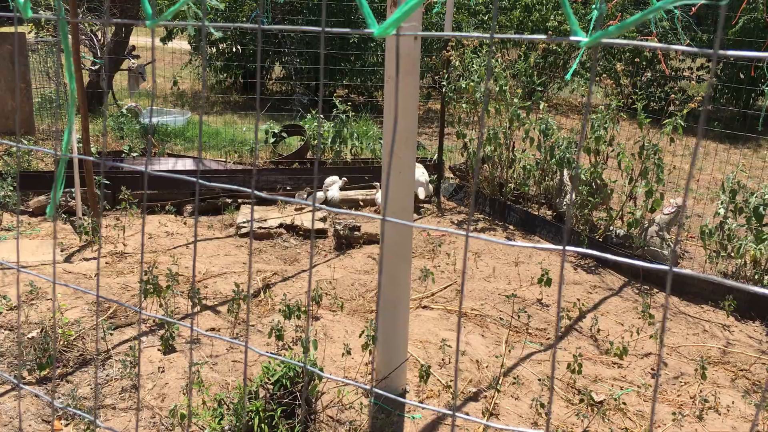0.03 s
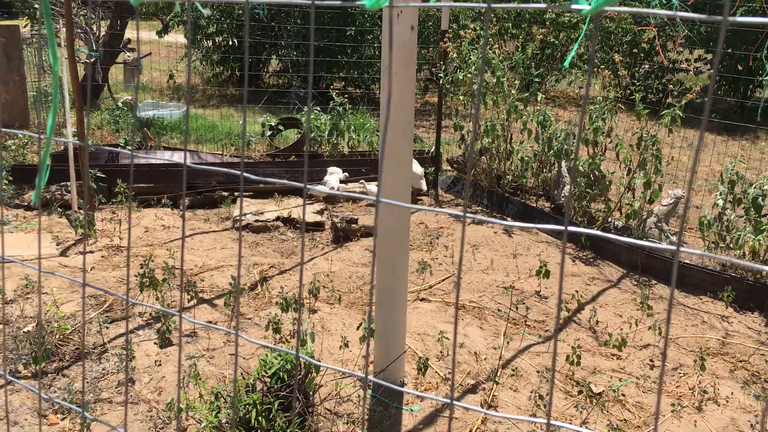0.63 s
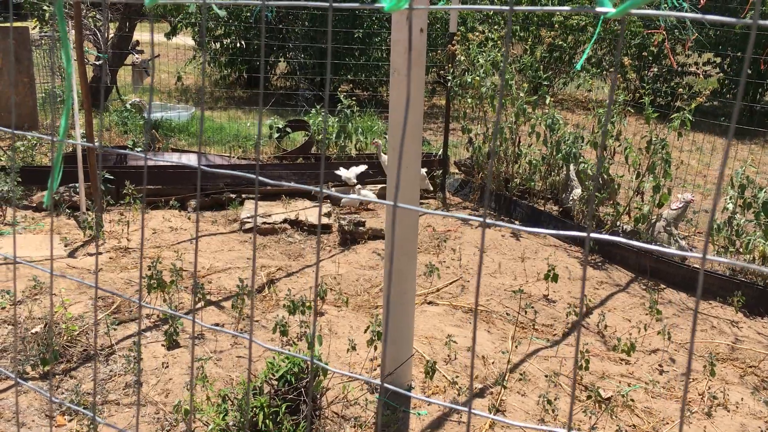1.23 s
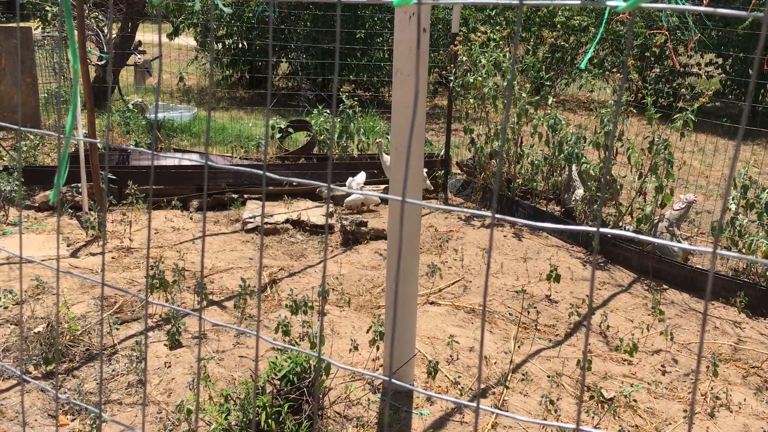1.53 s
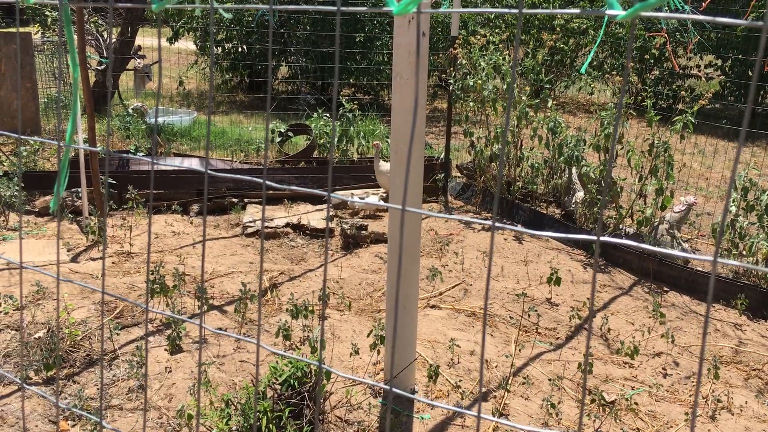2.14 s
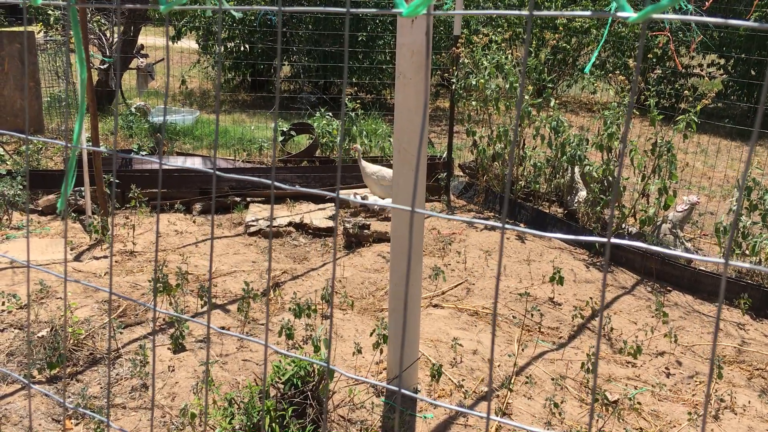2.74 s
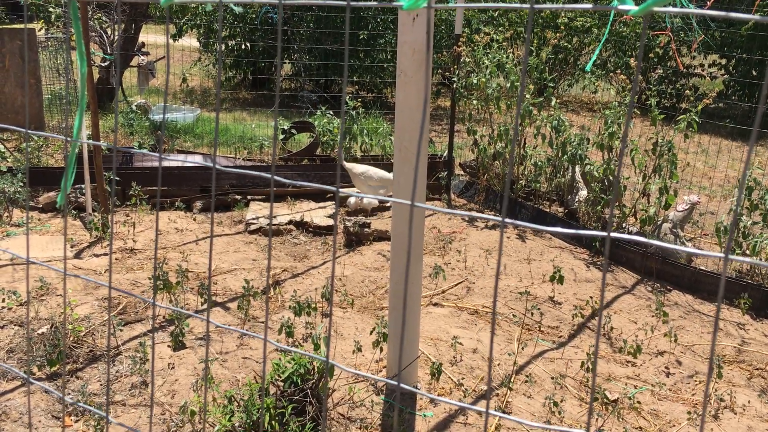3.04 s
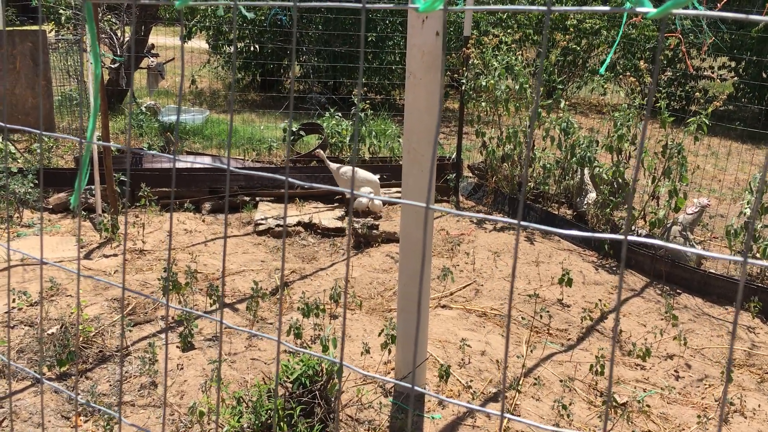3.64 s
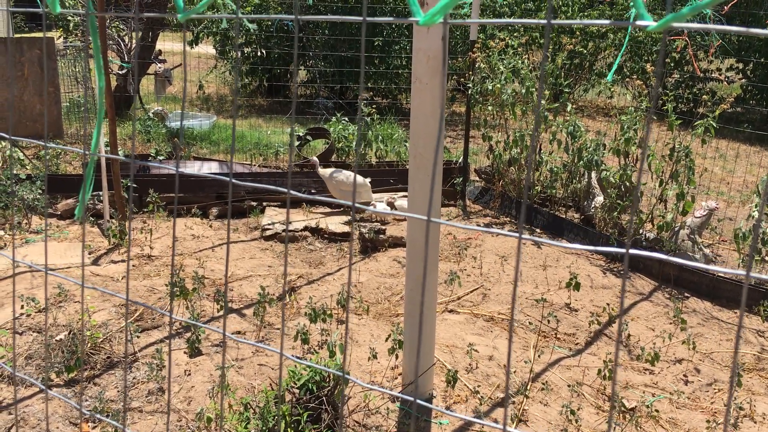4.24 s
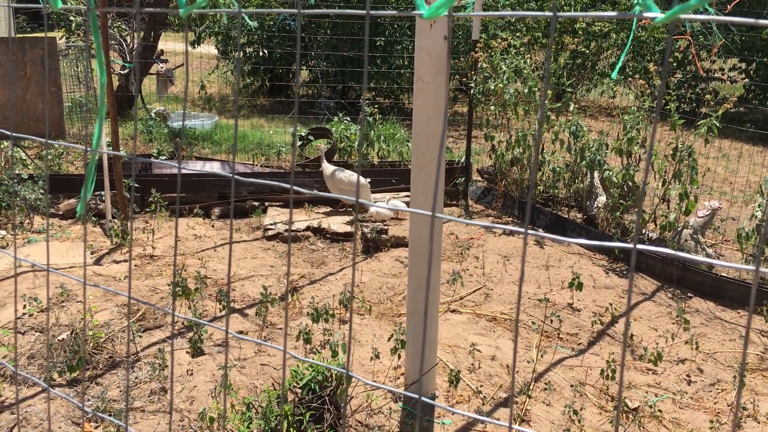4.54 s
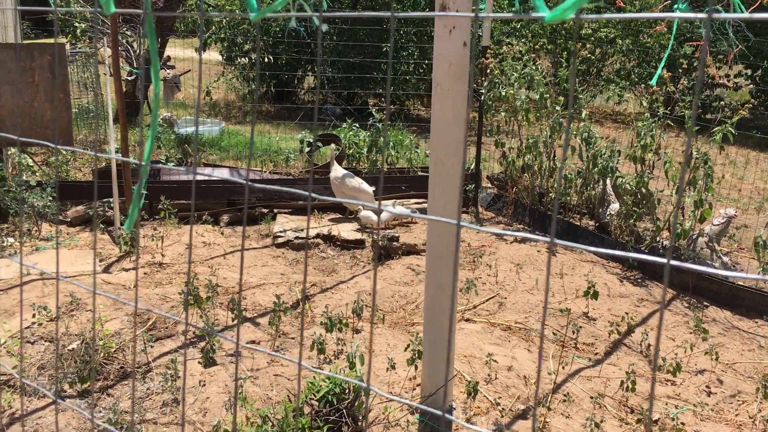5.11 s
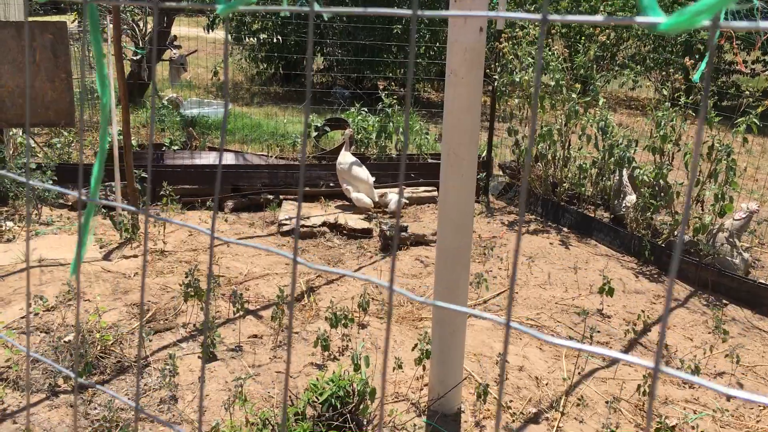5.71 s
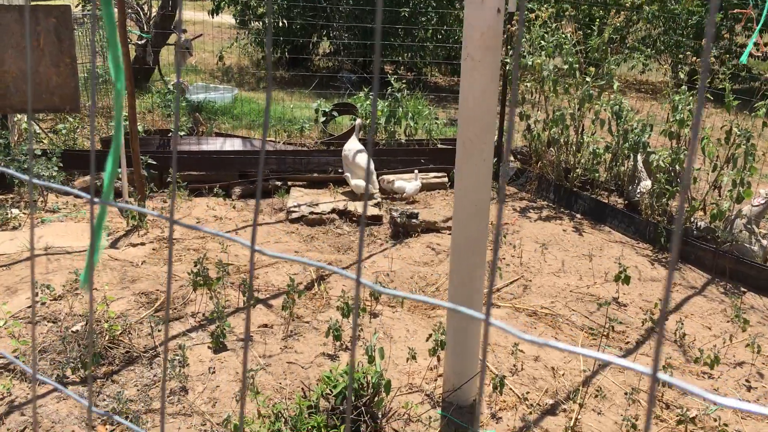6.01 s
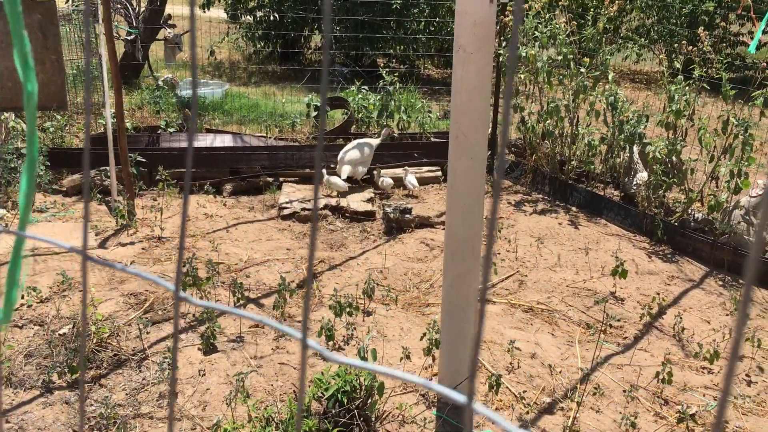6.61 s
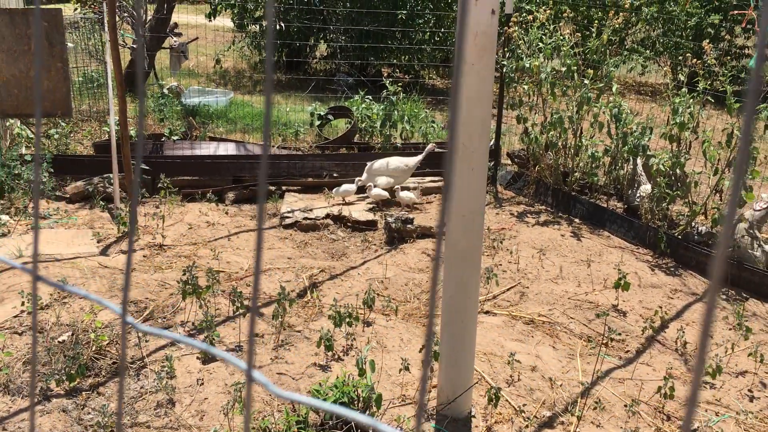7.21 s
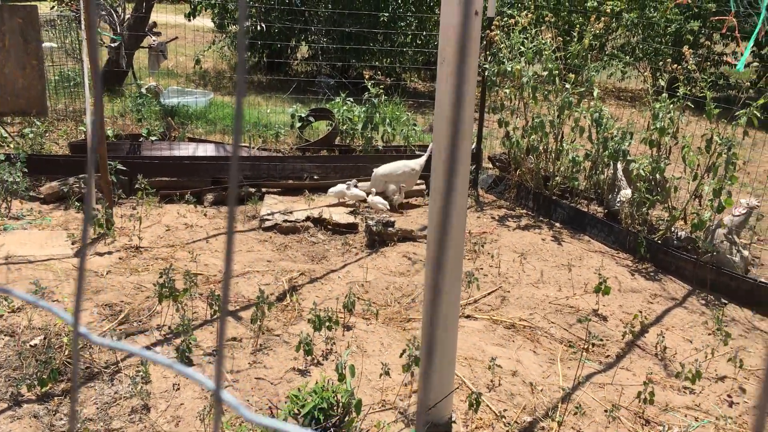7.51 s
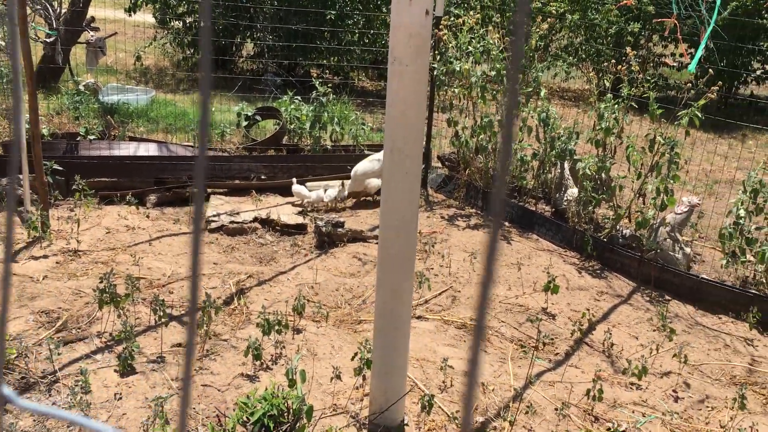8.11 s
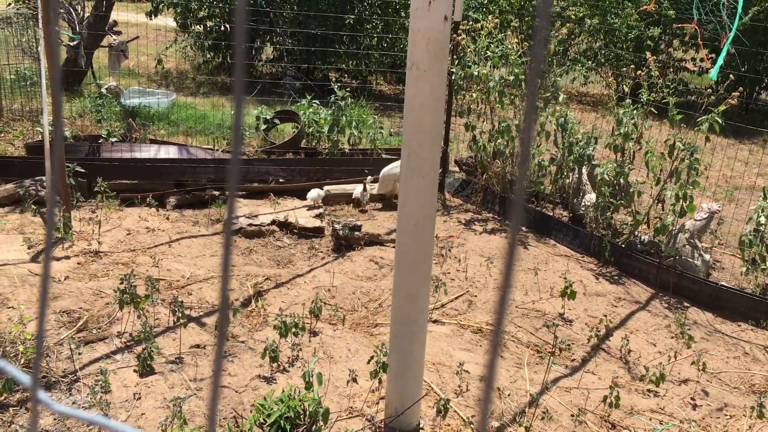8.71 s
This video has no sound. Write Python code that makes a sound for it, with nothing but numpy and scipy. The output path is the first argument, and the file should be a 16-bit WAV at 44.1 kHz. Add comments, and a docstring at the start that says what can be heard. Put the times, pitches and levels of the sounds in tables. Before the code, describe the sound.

At an outdoor fowl pen, three close cicadas rasp and pulse in turn through the first half, with brief guinea hen clucks in between. Far cicadas, a low distant engine and a soft breeze carry on underneath. Then come light scuffs, small knocks on the microphone, a thin songbird whistle and a few chick peeps, before a short whine from the hen and one more cicada swell.

```python
"""A hot day at a fowl pen: far cicadas hiss, a distant engine drones and a light breeze blows throughout.
From the start, three near cicadas swell in turn from a smooth hiss into a throbbing rasp, each clicking
its tymbals (ribbed, drum-like plates), while a guinea hen clucks now and then and her chicks peep.
From about 5 s come short scuffs, small handling knocks at the one microphone, and a songbird's whistle.
Near the end the hen whines and a fourth cicada swells."""
import sys
import numpy as np
from scipy import signal
from scipy.fft import rfft, irfft, next_fast_len
from scipy.io import wavfile
from scipy.ndimage import uniform_filter1d, map_coordinates

SR = 44100
rng = np.random.default_rng(int(sys.argv[2]) if len(sys.argv) > 2 else 0)


def file_out(sig):
    """Save sig as 16-bit WAV at sys.argv[1]."""
    # one column per channel
    cols = np.atleast_2d(sig).T
    # limit, then scale
    lim = np.clip(cols, -1, 1)
    pcm = np.round(lim * 32767).astype(np.int16)
    wavfile.write(sys.argv[1], SR, pcm)


N = 385875
T = np.arange(N) / SR


def amp(db):
    """Turn decibels into a gain."""
    return 10 ** (np.asarray(db) / 20)


def unit(x):
    """Scale a sound to an average strength (rms) of 1."""
    return x / np.sqrt(np.mean(x ** 2) + 1e-20)


def add(out, start, sound):
    """Mix a sound in at a start time in seconds."""
    out[round(start * SR):][:len(sound)] += sound


def wobble(rate):
    """A smooth curve through `rate` random points a second."""
    return map_coordinates(rng.standard_normal(int(N * rate / SR) + 4), [T * rate])


def swell(full, let_go, rise, fall):
    """A level in dB that rises to 0, holds, then falls; the slopes are in dB a second."""
    return -rise * np.maximum(full - T, 0) - fall * np.maximum(T - let_go, 0)


def hump(time, half_length):
    """A bell-shaped curve of height 1 round a moment."""
    return np.exp(-((T - time) / half_length) ** 2)


def filtered(x, response):
    """Scale each frequency in a sound by response(frequency)."""
    size = next_fast_len(len(x) + 8192)
    return irfft(rfft(x, size) * response(np.fft.rfftfreq(size, 1 / SR)), size)[:len(x)]


def coloured(x, spectrum):
    """Shape a sound with (frequency, level) points, at strength 1."""
    freqs, db = np.transpose(spectrum)
    return unit(filtered(x, lambda hz: amp(np.interp(np.log(hz + 1), np.log(freqs), db, left=-80))))


def resonant(x, modes):
    """Make a sound ring at (frequency, width, level) peaks, at strength 1."""
    def peak(hz, centre, width):
        return (2j * hz * width / (centre ** 2 - hz ** 2 + 2j * hz * width)) ** 2
    return unit(filtered(x, lambda hz: sum(amp(db) * peak(hz, f, width) for f, width, db in modes)))


def grains(rate, spread_db):
    """About `rate` randomly timed clicks a second, of uneven size and either sign."""
    sizes = rng.choice([-1, 1], N) * amp(spread_db * rng.uniform(-1.04, 1, N))
    return unit(sizes * (rng.random(N) < rate / SR))


# Swells of the far engine: (full at [s], let go at [s], level [dB])
ENGINE_SWELLS = [(0, 1.013, -54.5), (1.994, 3.946, -51), (5.81, 6.7, -58.5), (7.2, 7.3, -61),
                 (8.7, 8.75, -63.5)]
# Tone of the low rumble: (frequency [Hz], level [dB])
RUMBLE_SPECTRUM = [(20, -17), (32, -12), (45, -0.5), (56, 5), (68, -1.5), (100, -3), (125, -7.5),
                   (155, -14.5), (220, -19.5), (300, -25), (600, -51)]
def engine():
    """A far engine hums one wavering note; a low rumble gently follows its swells."""
    swells = [db + swell(full, let_go, rise=21, fall=21) for full, let_go, db in ENGINE_SWELLS]
    drone_db = np.max(swells, axis=0)
    rumble_db = -54.5 + .28 * (drone_db - drone_db.mean())
    rumble = amp(rumble_db + 1.23 * wobble(6.8)) * coloured(rng.standard_normal(N), RUMBLE_SPECTRUM)
    pitch_hz = 88.3 + 1.354 * wobble(9.3)
    phase = 2 * np.pi * np.cumsum(pitch_hz) / SR
    return rumble + amp(drone_db + 2.25 * wobble(6.6)) * unit(np.sin(phase))


# Gusts of wind: (time [s], half length [s], boost [dB])
BREEZE_GUSTS = [(5.384, 0.46, 3), (6.785, 0.44, 6), (7.63, 0.34, 5.5)]
# Tone of the breeze: (frequency [Hz], level [dB])
BREEZE_SPECTRUM = [(120, 6), (250, -4), (340, -0.5), (460, -4), (700, 2.5), (950, 5), (1200, 2),
                   (1550, -7.5), (2000, -38), (4000, -40)]
def breeze():
    """Air rushes softly through the bushes, louder in each gust."""
    level_db = -62 + sum(db * hump(time, half) for time, half, db in BREEZE_GUSTS)
    return amp(level_db + 1.2 * wobble(2.4)) * coloured(rng.standard_normal(N), BREEZE_SPECTRUM)


# Tone of the far cicadas: (frequency [Hz], level [dB])
CHORUS_SPECTRUM = [(1500, -6.5), (2000, -4), (2450, 4.5), (2850, -2), (3400, 2), (4100, 0), (4950, -4),
                   (5600, -1), (8400, -3.5), (10400, -14), (11400, -8), (12300, -11.5), (13200, -14.5),
                   (16000, -25)]
def chorus():
    """Many far cicadas merge into one even hiss."""
    return amp(-58 + 0.55 * wobble(2.36)) * coloured(rng.standard_normal(N), CHORUS_SPECTRUM)


# Ticks from handling the microphone: (time [s], base level [dB], extra for the click [dB])
HANDLING_TICKS = [(4.918, -60, -20), (5.038, -63, -12), (5.317, -49.5, -13), (5.364, -50, 8),
                  (5.451, -51, -22), (5.605, -54.5, 17), (5.837, -46.5, -20), (6.004, -50.5, -1),
                  (6.212, -53.5, 9), (7.771, -55, 7), (7.822, -50.5, -10), (8.016, -45, -7),
                  (8.041, -49, -19), (8.166, -50, -20)]
# Tone of a dull knock and of a bright click: (frequency [Hz], level [dB])
KNOCK_SPECTRUM = [(150, -8), (340, -2), (600, -3.5), (1200, 1), (2200, -12.5), (5000, -18), (12000, -32)]
CLICK_SPECTRUM = [(3000, -18), (6000, 0), (10000, -2), (15000, -3)]
def handling():
    """Small handling knocks and clicks at the microphone: bursts of noise that die away fast."""
    knock_s, click_s = 0.025, 0.0093  # time to fade by 60 dB
    out, t = np.zeros(N), np.arange(SR // 10) / SR
    for time, db, click_db in HANDLING_TICKS:
        knock = coloured(rng.standard_normal(len(t)), KNOCK_SPECTRUM)
        click = coloured(rng.standard_normal(len(t)), CLICK_SPECTRUM)
        add(out, time, amp(db + 6.5 - 60 * t / knock_s) * knock)
        add(out, time, amp(db + click_db - 0.5 - 60 * t / click_s) * click)
    return out


# A soft low rustle of wind at the start, then short scuffs: (time [s], half length [s], level [dB])
RUSTLE_SWELLS = [(.2, .45, -66.5), (4.9, 0.034, -69), (5.33, 0.052, -59), (5.478, 0.17, -58.5),
                 (5.844, 0.038, -55.5), (5.977, 0.19, -62.5), (7.726, 0.33, -62), (8.05, 0.047, -58)]
def rustles():
    """Many tiny knocks run together into a grainy rustle."""
    loudness = sum(amp(db) * hump(time, half) for time, half, db in RUSTLE_SWELLS)
    return loudness * coloured(grains(rate=1200, spread_db=12), KNOCK_SPECTRUM)


# Soft low bumps: (time [s], level [dB])
SOFT_BUMPS = [(3.41, -41), (3.606, -37.5), (3.898, -37), (4.17, -42), (4.52, -40), (4.851, -44),
              (5.849, -34.5), (6.098, -40.5), (6.209, -41), (7.2, -38.5), (7.31, -41)]
def bumps():
    """Each soft bump is a few cycles of a low 85 Hz tone."""
    out, t = np.zeros(N), np.arange(SR // 10) / SR
    middle = t.mean()
    bump = np.exp(-((t - middle) / 0.012) ** 2) * np.sin(2 * np.pi * 85 * t)
    for time, db in SOFT_BUMPS:
        add(out, time - middle, amp(db) * bump)
    return out


def whistle(hz, tone, waver):
    """A bird's clear gliding note; `waver` is its unsteadiness as a share of the pitch."""
    phase = 2 * np.pi * np.cumsum(hz * (1 + waver * wobble(317)[:len(hz)])) / SR
    return unit(sum(amp(db) * np.sin(multiple * phase) for multiple, db in tone))


# Chicks' peeps and one thin songbird whistle, all played 3% below these pitches:
# (time [s], length [s], first pitch [Hz], last pitch [Hz], level [dB])
PEEP_NOTES = [(2.04, 0.042, 4000, 3400, -63), (2.25, .04, 4100, 3520, -65), (5.405, 0.23, 7180, 7070, -58),
              (6.40, .06, 3600, 3200, -62), (6.926, 0.045, 4650, 3100, -45),
              (6.967, 0.027, 3450, 3970, -53), (7.002, 0.037, 4150, 3400, -58),
              (7.12, .032, 3600, 3020, -59), (7.685, .028, 3500, 3950, -53), (7.708, .032, 3950, 3000, -58)]
def peeps():
    """Each peep is one slightly husky glide that slows towards its end, louder where it is lower."""
    glide_ease, db_per_octave = 1.9, -24
    out = np.zeros(N)
    for time, length, first_hz, last_hz, db in PEEP_NOTES:
        progress = np.linspace(0, 1, int(length * SR))
        hz = last_hz + (first_hz - last_hz) * (1 - progress) ** glide_ease
        shape = np.sqrt(np.abs(np.sin(np.pi * progress))) * amp(db_per_octave * np.log2(hz / hz.min()))
        add(out, time, amp(db) * shape * whistle(hz, tone=[(0.97, 0)], waver=0.0027))
    return out * (1 + .25 * wobble(500))  # fast flutter sounds husky


# The hen's whines:
# (time [s], length [s], lowest pitch [Hz], climb [Hz/s], level [dB], fade-in [s], fade-out [dB/s])
WHINE_NOTES = [(7.526, 0.141, 831, 300, -38, 0.0093, 45), (7.754, 0.059, 899, 900, -40, 0.034, 420),
               (7.82, 0.054, 920, 900, -52, 0.022, 207)]
# Tone of a whine: (multiple of the pitch, level [dB])
WHINE_HARMONICS = [(1, -15), (2, 2.5), (3, -23), (4, -10), (5, -24)]
def whines():
    """The hen scoops down into a slightly hoarse note and lets it creep up and fade."""
    scoop_share, scoop_s = 0.112, 0.0386  # how far above the lowest pitch she starts; time to drop
    out = np.zeros(N)
    for time, length, low_hz, climb, db, fade_in, fade_out in WHINE_NOTES:
        t = np.arange(int(length * SR)) / SR
        scoop = scoop_share * np.maximum(1 - t / scoop_s, 0) ** 1.41
        hz = low_hz * (1 + scoop) + climb * np.maximum(t - scoop_s, 0)
        shape = np.clip(np.minimum(t / fade_in, (length - t) / 0.0056), 0, 1) ** 2
        loudness = amp(db - fade_out * np.maximum(t - fade_in, 0)) * shape
        add(out, time, loudness * whistle(hz, WHINE_HARMONICS, waver=.01))
    return out * (1 + 0.08 * wobble(700)) * amp(wobble(72))  # flutter sounds hoarse


# The hen's clucks:
# (time [s], length [s], pitch [Hz], level [dB], throat note [Hz], beak level [dB], roughness [0-1])
HEN_CLUCKS = [(0.544, 0.086, 516, -57.5, 1520, -24.5, 0.58), (0.929, 0.017, 729, -34.5, 1530, -1, 0.54),
              (0.939, 0.024, 960, -33, 1640, -10, 0.08), (2.092, 0.011, 722, -49, 1460, -32, 0.25),
              (2.554, 0.019, 524, -52.5, 1020, -28, 0.2), (2.758, 0.033, 323, -50.5, 1590, -20, 0.57),
              (3.638, 0.016, 345, -41.5, 1700, -24, 0.4), (3.665, .008, 342, -50, 1680, -11, 0.6),
              (4.048, 0.022, 476.3, -30, 1510, 3, 0.65), (4.894, 0.041, 255, -59, 503, -30, 0.04),
              (5.869, 0.024, 472.6, -32.5, 1270, 2.5, 0.5), (5.881, 0.023, 315, -39.5, 1310, 6, 0.1),
              (6.275, 0.011, 660, -52.5, 1320, -22, 0.5), (7.102, 0.01, 674, -51, 1320, -24, 0.5),
              (7.515, .035, 678, -45.5, 1350, -4.5, 0.54), (7.735, 0.031, 725, -53.5, 1460, -18, 0.3)]
# Where her throat rings: (multiple of the throat note, width [Hz], level [dB])
THROAT_MODES = [(.7, 190, -52), (1, 260, 20), (1.24, 172, 12), (1.45, 170, 4)]
# Where her beak and chest ring: (frequency [Hz], width [Hz], level [dB])
BEAK_MODES = [(2875, 46, -3.5), (3440, 170, 1), (3830, 390, -2), (4230, 1170, -12.5)]
CHEST_MODES = [(346, 33, 0)]
def clucks():
    """Harsh bursts from the hen's voice box ring in her throat and beak; low ones boom in her chest."""
    jitter_share, chest_hz = .06, CHEST_MODES[0][0]
    out, t = np.zeros(N), np.arange(SR // 8) / SR
    for time, length, hz, db, throat_hz, beak_db, rough in HEN_CLUCKS:
        jitter, hiss = rng.standard_normal((2, len(t)))
        pitch_hz = hz * (1 + jitter_share * rough * unit(uniform_filter1d(jitter, SR // 400)))
        phase = 2 * np.pi * np.cumsum(pitch_hz) / SR
        pulses = unit(sum(np.cos(k * phase) for k in range(1, 15)))
        shape = np.sin(np.pi * np.minimum(t / length, 1)) ** 2
        voice = np.sqrt(shape) * ((1 - rough) * pulses + rough * hiss * (1 + np.cos(phase)))
        throat = [(k * throat_hz, width, level) for k, width, level in THROAT_MODES]
        call = unit(resonant(voice, throat) + amp(beak_db) * resonant(voice, BEAK_MODES))
        octaves_above_chest = np.log2(max(hz / chest_hz, 1))
        boom = amp(-10 - 41 * octaves_above_chest) * resonant(voice, CHEST_MODES)
        add(out, time, amp(db) * (call + boom) * np.sqrt(shape.mean()))
    return out


# Thin hisses that end the cicadas' songs: (full at [s], let go at [s], rise [dB/s], fall [dB/s],
# pitch when full [Hz], sinking [Hz/s], width [Hz], level [dB])
SONG_TRAILS = [(1.69, 1.9, 75, 49, 9080, 800, 420, -57), (2.05, 2.7, 8, 3, 12150, 547, 260, -71.5),
               (2.052, 2.6, 12, 13, 6110, 201, 220, -72), (4.32, 4.42, 42, 39, 7510, 506, 380, -57.5),
               (4.852, 5.35, 14, 25, 8400, 60, 450, -64)]
def trails():
    """Each narrow hiss sinks in pitch as a tymbal relaxes."""
    out = np.zeros(N)
    for full, let_go, rise, fall, hz, sinking, width_hz, db in SONG_TRAILS:
        flutter = filtered(rng.standard_normal(N), lambda f: 1 / (1 + (f / width_hz) ** 2))
        phase = 2 * np.pi * np.cumsum(hz - sinking * (T - full)) / SR
        out += amp(db + swell(full, let_go, rise, fall)) * unit(flutter * np.sin(phase))
    return out


def throb(depth_db):
    """A pulsing gain, evened out so that the average loudness stays steady."""
    gain = amp(depth_db)
    return gain / np.sqrt(uniform_filter1d(gain ** 2, SR // 7))


# Tone of each near cicada's rasp: (frequency [Hz], level [dB])
RASP_1 = [(1700, -21), (2100, -12), (2500, -0.5), (2900, -6.5), (3700, -3.5), (4900, -7), (6600, -1.5),
          (8500, -1.5), (9500, -6.5), (10400, -12), (11200, -7), (12200, -10), (13000, -15.5),
          (16000, -16.5)]
RASP_2 = [(1900, -46), (2450, 3), (2850, -2.5), (3300, 7.5), (4100, 4.5), (4950, -0.5), (6000, 0.5),
          (7300, -1.5), (8300, 4), (9200, -7), (10400, -19), (11500, -6.5), (13200, -15), (16000, -22)]
RASP_3 = [(2200, -6.5), (4800, -5.5), (6300, 2), (7800, -6), (9300, -6.5), (12000, -7), (16000, -18)]
RASP_4 = [(2000, -23), (2500, -12.5), (3500, -5), (4900, -11), (6000, -4), (7500, -2.5), (9000, -6),
          (10400, -11), (11400, -8), (16000, -24)]
# Where each one's hollow belly rings: (frequency [Hz], width [Hz], level [dB])
BELLY_1 = [(7880, 110, 0), (8060, 90, -5), (8470, 150, -3)]
BELLY_2 = [(7100, 720, 0), (8000, 2100, 4)]
BELLY_3 = [(6870, 540, -0.72), (7310, 620, -0.28)]
BELLY_4 = [(8200, 220, -1), (8360, 450, 0)]
# Each one's song: (full at [s], let go at [s], rise [dB/s], fall [dB/s], rasp level [dB],
# treble level [dB], ring level [dB], brightening while held [dB/s]); negative brightening dulls it
CICADA_SONGS = [(0, 1.59, 30, 58, -51, -46, -50.5, 5), (2.2, 4.03, 2, 9.5, -49.5, -56.5, -68, -5.5),
                (3.1, 4.39, 16, 14, -53.5, -53.5, -54, 0.5), (8.72, 11.3, 7, 10, -56, -65, -64, 0.5)]
# Each one's beat: (starts slowing at [s], first rate [Hz], settled rate [Hz], settling time [s])
CICADA_BEATS = [(0.089, 23.962, 19.508, 0.844), (2.76, 35.947, 21.262, 0.277),
                (3.354, 35.947, 21.362, 0.339), (7.955, 31.132, 22.484, 0.14)]
# Each one's settled throb: (rasp depth [dB], ring depth [dB])
THROB_DEPTHS = [(9, 22), (7.5, 5.5), (2.5, 3.5), (5, 14)]
def cicada(singer, rasp_spectrum, belly_modes):
    """Tymbal ribs buckle in dense clicks; the belly rings and pumps the level as the beat settles."""
    full, let_go, rise, fall, rasp_db, treble_db, ring_db, brightening = CICADA_SONGS[singer]
    slows_at, first_hz, settled_hz, settling_s = CICADA_BEATS[singer]
    rasp_depth, ring_depth = THROB_DEPTHS[singer]
    blur_hz, treble_hz = 3.3, 7900  # extra beat speed that blurs the throb; where the treble begins
    effort = amp(swell(full, let_go, rise, fall))
    bright_db = brightening * (np.clip(T, full, let_go) - let_go)
    beat_hz = settled_hz + (first_hz - settled_hz) * np.exp(-np.maximum(T - slows_at, 0) / settling_s)
    beats = np.cumsum(beat_hz) / SR
    swing = np.cos(2 * np.pi * (beats - np.interp(slows_at, T, beats)))
    depth = np.exp((settled_hz - beat_hz) / blur_hz) * effort ** .3 * (1 + .07 * wobble(18))
    pump = depth * np.clip(.5 + swing / np.sqrt(2), 0, 1) ** 2
    clicks = coloured(grains(rate=8000, spread_db=6), rasp_spectrum)
    treble = filtered(clicks, lambda hz: hz ** 4 / (hz ** 4 + treble_hz ** 4))
    # As the song brightens, the lower rasp gives way to the treble and the ring.
    rasp = (clicks - treble) * amp(rasp_db - 0.72 * bright_db)
    rasp += treble * amp(treble_db + 0.39 * bright_db)
    ring = resonant(grains(rate=5000, spread_db=-0.5), belly_modes) * amp(ring_db + bright_db)
    return effort * (rasp * throb(rasp_depth * pump) + ring * throb(ring_depth * pump))


def near_cicadas():
    """Four near cicadas overlap in turn, each with its own rasp and ring."""
    voices = [(RASP_1, BELLY_1), (RASP_2, BELLY_2), (RASP_3, BELLY_3), (RASP_4, BELLY_4)]
    return sum(cicada(singer, rasp, belly) for singer, (rasp, belly) in enumerate(voices))


def yard(x, echo_db, fade_s):
    """Add short echoes from ground, fence and bushes, which fall by 60 dB in fade_s."""
    t = np.arange(SR // 3) / SR
    echoes = unit(rng.standard_normal(len(t)) * amp(-60 * t / fade_s) * (t > .002)) / np.sqrt(len(t))
    return x + amp(echo_db) * signal.fftconvolve(x, echoes)[:N]


def scene():
    """Near cicadas and birds echo in the yard; everything reaches one microphone."""
    insects = yard(near_cicadas() + trails(), echo_db=-8, fade_s=0.049) + chorus()
    birds = yard(clucks() + whines() + peeps(), echo_db=-13, fade_s=0.24)
    small_noises = handling() + rustles() + bumps()
    mono = engine() + breeze() + small_noises + birds + insects
    return np.array([mono, mono])


def record(dry):
    """The microphone opens a moment late and keeps nothing above its highest frequency."""
    open_s, top_hz = .036, 15800
    return np.array([filtered(x * (T > open_s), lambda hz: hz < top_hz) for x in dry])


dry = scene()
out = record(dry)
file_out(out)
```